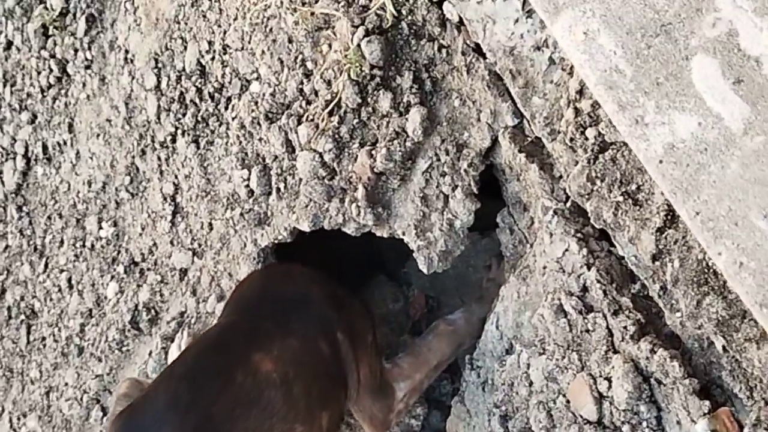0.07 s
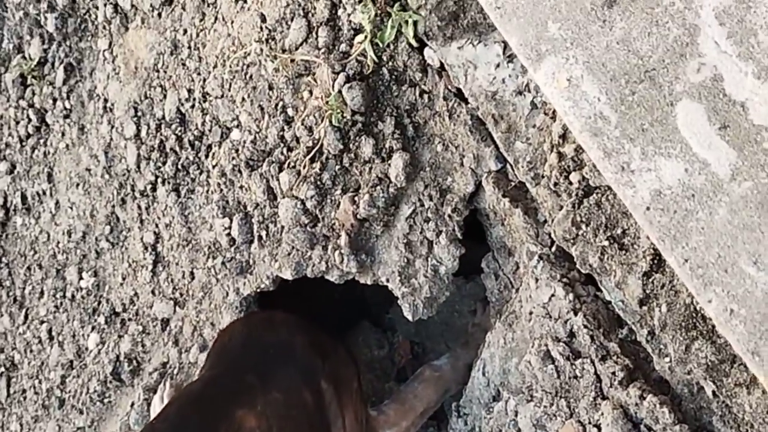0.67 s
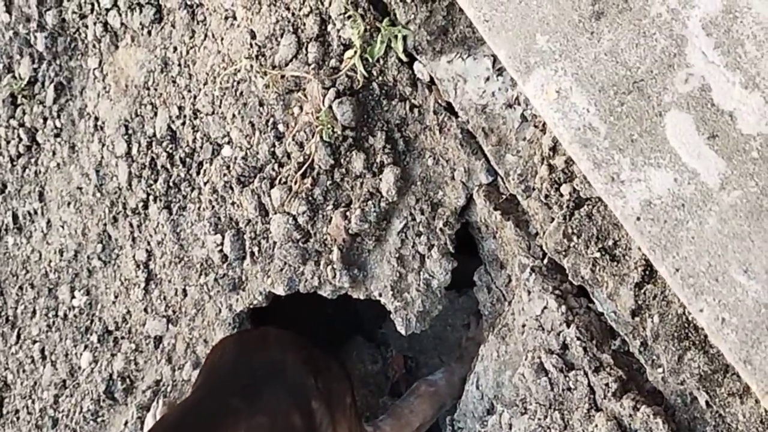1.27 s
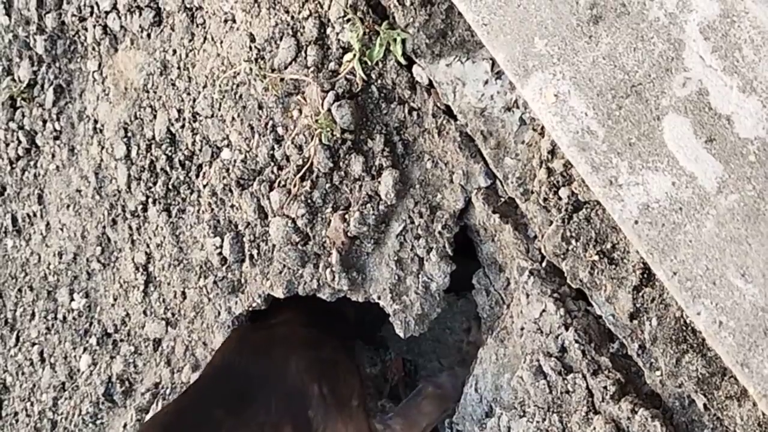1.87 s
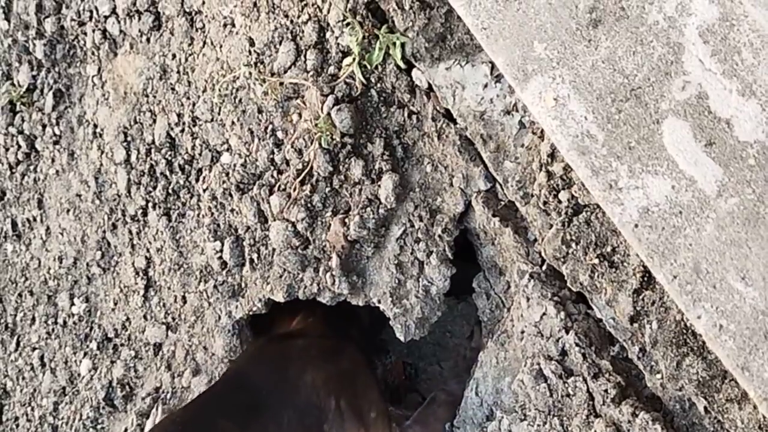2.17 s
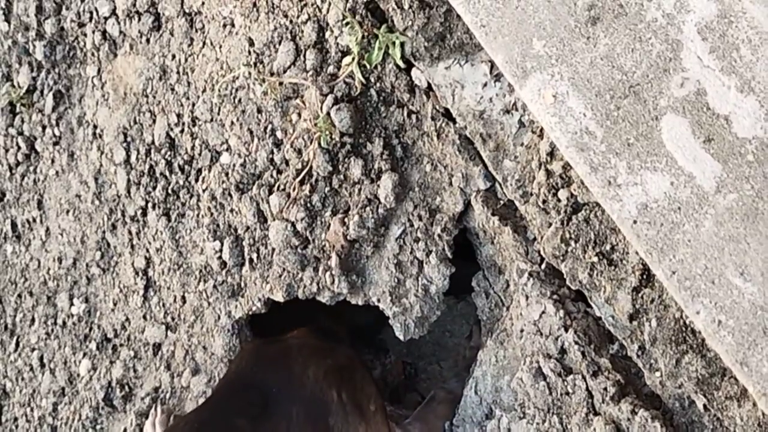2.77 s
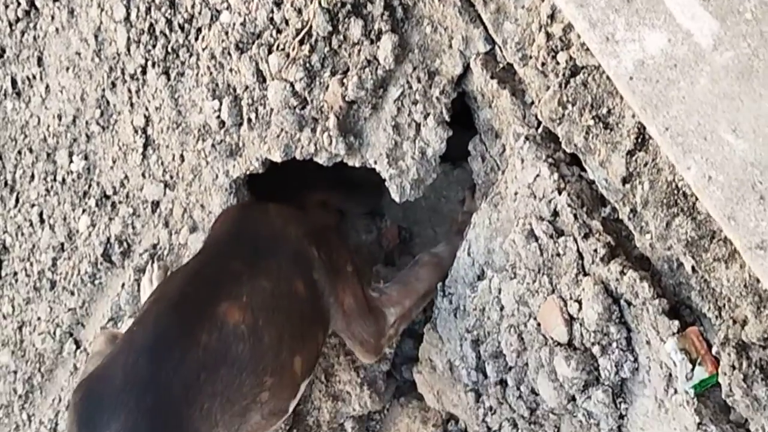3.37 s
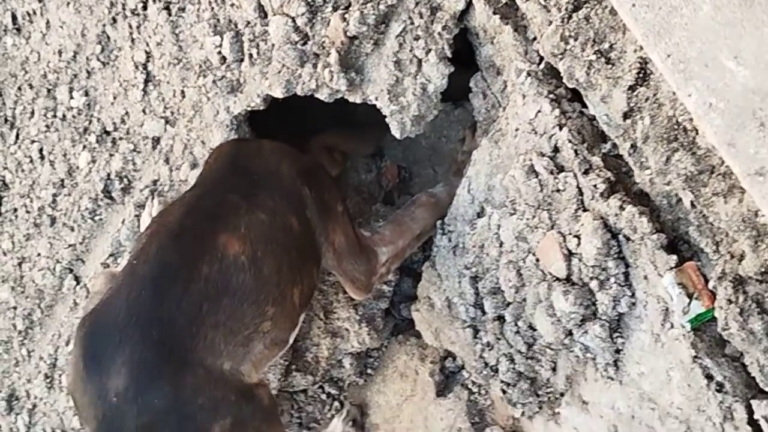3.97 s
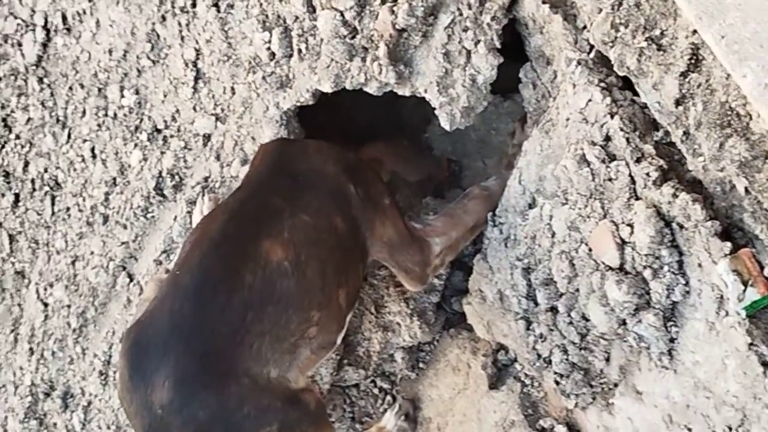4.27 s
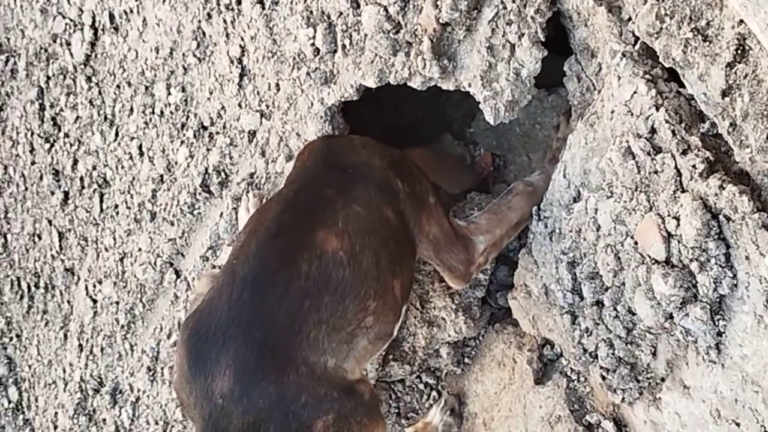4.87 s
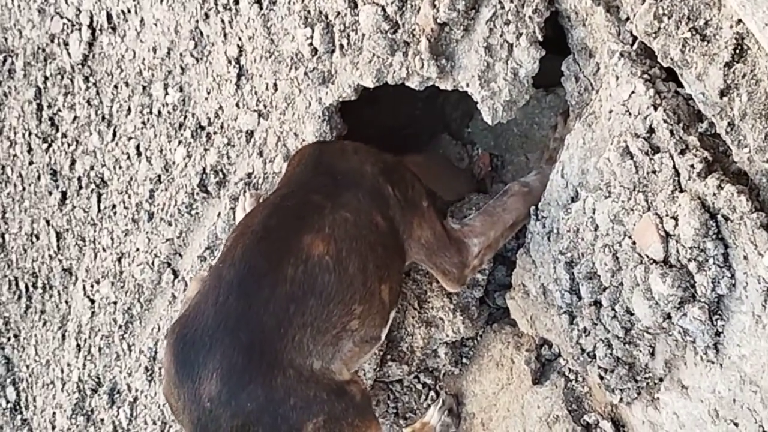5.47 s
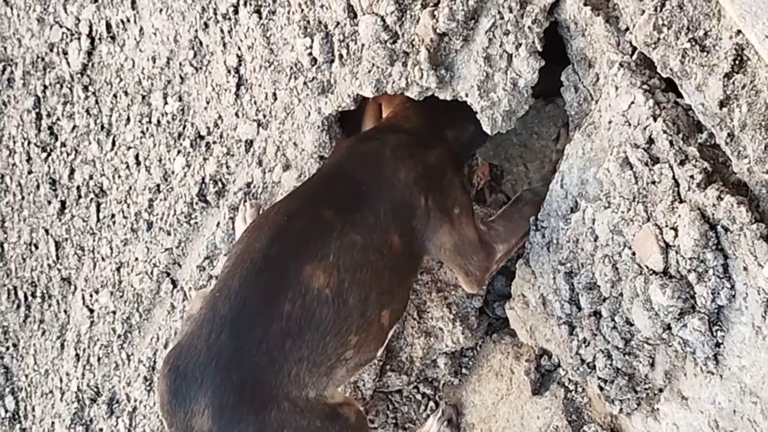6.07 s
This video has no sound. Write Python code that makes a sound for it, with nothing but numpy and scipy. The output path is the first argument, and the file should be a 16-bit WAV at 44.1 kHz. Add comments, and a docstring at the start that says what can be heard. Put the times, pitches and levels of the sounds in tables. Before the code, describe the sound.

A bird sings hoarse rasps, buzzes, stuttered chips and thin whistles close by, over distant traffic rumble and a wavering engine hum.

```python
"""Distant traffic rumbles, and a far engine hums through it in wavering swells.
Close by on the right a bird sings: hoarse low rasps and two phrases of a buzz, a rasp, stuttered chips
and a thin slurred whistle. Its syrinx vibrates, its throat resonances shape the harmonics, and air
hisses through its bill. A dog stands quietly with its head in a hole; now and then a little grit
shifts under it."""
import sys
import numpy as np
from scipy import signal
from scipy.fft import rfft, irfft, next_fast_len
from scipy.io import wavfile
from scipy.ndimage import uniform_filter1d

SR = 44100
rng = np.random.default_rng(int(sys.argv[2]) if len(sys.argv) > 2 else 0)


def put_to_file(sound):
    """Save the sound as 16-bit audio at rate SR, in the file named by the first command-line argument."""
    columns = np.atleast_2d(sound).T  # one column per channel
    safe = np.clip(columns, -1, 1)
    whole_steps = np.round(safe * 32767)
    wavfile.write(sys.argv[1], SR, whole_steps.astype(np.int16))


N = 274743

# Road rumble and far hiss. Each row: frequency in Hz, relative spectral density in dB.
RUMBLE_SPECTRUM = [(12, -39), (20, -9), (65, -4), (97, -5), (128, -4.5), (151, -8.5), (386, -18),
                   (416, -19.5), (594, -20.5), (700, -29), (910, -65), (1540, -120)]
FAR_HISS_SPECTRUM = [(500, -8.5), (700, 9), (1200, 6), (2000, 4.5), (2700, 0), (3500, -7), (4700, -4.5),
                     (6200, -4), (7500, -9.5), (8700, -7.5), (11000, -11.5), (13000, -22), (15500, -25)]
# Coherence of the background. Each row: frequency in Hz, left-right correlation.
COHERENCE = [(60, 1), (120, 0.9646), (240, 0.968), (480, 0.494), (950, 0.094), (1890, -0.025), (3770, 0.22),
             (7520, -0.042), (15000, -0.22)]
# Balance of the background. Each row: frequency in Hz, left minus right in dB.
BALANCE = [(60, 1.5), (150, 0), (380, -1.5), (950, -1.5), (2380, -1.5), (5980, -6), (15000, 2.5)]
# The engine gathers speed, then drops. Each row: time in seconds, shaft rate in Hz.
ENGINE_SPEED = [(0, 29.7), (1.6, 30.7), (3.8, 34.44), (4.3, 35.08), (5.1, 36.7), (5.25, 26.26),
                (6.23, 26.9)]
# Engine harmonics. Each row: multiple of the shaft rate, relative level in dB.
ENGINE_ORDERS = [(2, -9), (3, -1), (5, -11)]
# Swells of the hum. Each row: start in seconds, length in seconds, relative level in dB.
HUM_SWELLS = [(.55, 1.34, -36.5), (2.079, 0.867, -36), (3.026, 0.856, -34.5), (4.07, 1.04, -36.5),
              (5.305, 1.2, -36.5)]
# Whistles. Each row: start and length in seconds, first, middle and last pitch in Hz, level in dB.
WHISTLES = [(0.244, 0.046, 4120, 3570, 3340, -58.5), (2.04, 0.11, 3000, 2667, 2300, -51),
            (2.162, 0.0465, 1796, 2460, 3070, -47.5), (2.182, 0.0217, 4800, 5000, 4700, -51),
            (4.396, .13, 2965, 2870, 2670, -55), (5.007, 0.094, 3100, 2720, 2603, -53),
            (5.136, 0.0368, 1793, 2170, 2585, -45)]
# Rasps. Each row: start, length, attack and release in seconds, then the crest's level in dB,
# pitch in Hz and roughness from 0 to 1.
RASPS = [(.64, 0.3314, 0.086, 0.0795, -37, 1683, 0.81), (1.274, 0.4142, 0.1387, 0.081, -31, 1792, 0.83),
         (4.147, .27, 0.0223, 0.0633, -28, 1353, .05), (4.782, 0.248, 0.064, 0.102, -44, 1414, 0.78),
         (5.361, 0.4032, 0.1284, 0.119, -38.5, 1458, 0.67), (6.031, .34, 0.195, 0.1023, -35.5, 1409, .8)]
# Throat resonances of the low and high voices. Each row: frequency in Hz, relative gain in dB.
LOW_THROAT = [(700, 20.5), (1080, 3), (1330, -3), (1650, -3), (2150, -5.5), (2600, -26), (3700, -28),
              (6000, -30.5), (9000, -60.5)]
HIGH_THROAT = [(1200, -23), (1800, -7.5), (2300, 3), (2850, 2), (3500, 1.5), (4200, -1), (4900, 5),
               (5450, 6), (6100, -5), (6750, -4), (7500, -9.5), (8300, -6), (11000, -21.5), (15000, -32)]
# Air through the bill. Each row: frequency in Hz, relative spectral density in dB.
BILL_HISS = [(500, 1), (1000, 12), (2500, 2), (3800, -3), (5700, 4), (6700, 3.5), (7600, 6.5), (9000, -1),
             (12000, -8), (15500, -22.5)]
# Quick pips, then a held note. Each row: start in seconds, number of pips, pip spacing and held length
# in seconds, the held note's first and last pitch in Hz, opening level in dB, held note's fade in dB.
STUTTERS = [(1.154, 0, .0125, 0.0073, 1336, 1200, -32.5, 6),
            (1.628, 0, .0125, 0.028, 1211, 1072, -33.5, 12),
            (1.722, 1, 0.0119, 0.0211, 1198, 1097, -37.5, 5),
            (1.822, 3, .013, 0.0176, 1212, 1241, -34, 0.5), (1.957, 4, 0.01244, 0.048, 1190, 1020, -36, 18),
            (4.078, 0, .0125, 0.0108, 1250, 1151, -31.5, 5), (4.568, 1, .0115, 0.0315, 1275, 1076, -35, 6),
            (4.681, 1, 0.0136, 0.015, 1201, 1100, -39, 3),
            (4.78, 2, 0.01234, 0.02022, 1228, 1172, -35, 2.5),
            (4.9077, 5, 0.01156, 0.0685, 1206, 1044, -34.5, 12)]
# Buzzes. Each row: start and warble length in seconds, level in dB, starting pitch in Hz.
BUZZES = [(1.164, .097, -28.5, 1328), (4.091, 0.0848, -27, 1316)]
# The song at two microphone ports. Each row: frequency in Hz, left phase lead in radians
# (before limiting), left minus right in dB.
PORTS = [(500, 0, 24), (1110, -0.11, -4), (1630, 0.76, -10.5), (2237, 1.5, 1), (2296, -1.92, -5),
         (3120, -1.5, -1.5), (3663, 2.5, 6), (4370, 0.65, -4.5), (5360, 1.5, -16), (6700, 1.46, 2),
         (7500, -1.12, -7), (9550, -1.7, 3)]
# Shifts of grit. Each row: start in seconds, length in seconds, level in dB.
GRIT = [(2.692, 0.0592, -56.5), (2.728, 0.015, -62.5), (3.22, 0.071, -56.5), (4.772, .006, -57),
        (6.011, 0.0073, -62)]


def gain_of(db):
    """Amplitude grows tenfold for every 20 dB."""
    return 10 ** (np.asarray(db) / 20)


def unit_rms(x):
    """Normalisation to unit mean power."""
    return x / np.sqrt(np.mean(x ** 2) + 1e-20)


def at_hz(points, hz):
    """Interpolation of a spectrum on a logarithmic frequency axis."""
    knots_hz, value = np.transpose(points)
    return np.interp(np.log(hz + 1), np.log(knots_hz + 1), value)


def follow(rows, x):
    """Linear interpolation of each later column against the first."""
    knots, *columns = np.transpose(rows)
    return [np.interp(x, knots, column) for column in columns]


def add(mix, start, sound):
    """Superposition: a sound joins the mix at its start in seconds."""
    part = mix[max(round(start * SR), 0):][:len(sound)]
    part += sound[:len(part)]


def noise(spectrum, size):
    """Spectral shaping of white noise, at unit power."""
    shape = gain_of(at_hz(spectrum, np.fft.rfftfreq(size, 1 / SR)))
    return unit_rms(irfft(rfft(rng.standard_normal(size)) * shape, size))


def wander(size, top_hz):
    """Low-pass filtering turns noise into a drift, mostly slower than top_hz."""
    padded = next_fast_len(size + SR // 4)
    hz = np.fft.rfftfreq(padded, 1 / SR)
    spectrum = rfft(rng.standard_normal(padded)) / (1 + (hz / top_hz) ** 2) ** 2
    return unit_rms(irfft(spectrum, padded))[:size]


def taper(t, fade_s):
    """A raised-cosine envelope keeps a note's ends from clicking."""
    return np.sin(np.pi / 2 * np.clip(np.minimum(t - t[0], t[-1] - t) / fade_s, 0, 1)) ** 2


def diffuse_noise(spectrum, patchy_db):
    """Partial coherence: noise with drifting patches of level is alike on both sides in the bass."""
    frames, hz = N // 512 + 5, np.fft.rfftfreq(2048, 1 / SR)
    a, b, c, d, patches = rng.standard_normal((frames, len(hz), 5)).T
    patches = unit_rms(uniform_filter1d(uniform_filter1d(patches, size=24, axis=0), size=10, axis=1))
    coherence = at_hz(COHERENCE, hz)[:, None]
    left = a + 1j * b
    right = coherence * left + np.sqrt(1 - coherence ** 2) * (c + 1j * d)
    tilt = gain_of(at_hz(BALANCE, hz)[:, None] / 2)
    spectra = np.array([left * tilt, right / tilt])
    spectra *= gain_of(at_hz(spectrum, hz)[:, None] + patchy_db * patches)
    stereo = signal.istft(spectra, nperseg=2048, noverlap=1536)[1][:, :N]
    return stereo / np.std(stereo.mean(0))


def engine(fade_s=0.1274, lull_db=-51, trim_db=-1):
    """A rotating engine radiates harmonics of its shaft rate; the hum swells over a faint drone."""
    t = np.arange(N) / SR
    shaft_hz = follow(ENGINE_SPEED, t)[0] * (1 + 0.00795 * wander(N, 11.65))
    angle = 2 * np.pi * np.cumsum(shaft_hz) / SR
    hum = sum(gain_of(db) * np.sin(k * angle) * (1 + 0.122 * wander(N, 9)) for k, db in ENGINE_ORDERS)
    swells = sum(gain_of(db) * np.clip(np.minimum(t - start, start + length - t) / fade_s, 0, 1)
                 for start, length, db in HUM_SWELLS)
    return gain_of(trim_db) * np.maximum(swells, gain_of(lull_db)) * unit_rms(hum)


def traffic(rumble_db=-34.5, hiss_db=-48):
    """Incoherent sources add in power: one engine, far hiss and road rumble."""
    hum = engine()
    hiss = gain_of(hiss_db) * diffuse_noise(FAR_HISS_SPECTRUM, patchy_db=1.3)
    rumble = gain_of(rumble_db) * diffuse_noise(RUMBLE_SPECTRUM, patchy_db=1)
    return hum + hiss + rumble


def whistle(start, length, first_hz, middle_hz, last_hz, level_db, octave_db=-9, flicker_db=4):
    """Random modulation of pitch and level unsettles a gliding tone with a weak octave."""
    t = np.arange(0, length, 1 / SR)
    pitch = np.interp(t, [0, length / 2, length], [first_hz, middle_hz, last_hz])
    pitch *= 1 + .035 * wander(len(t), 700)
    angle = 2 * np.pi * np.cumsum(pitch) / SR
    tone = np.sin(angle) + gain_of(octave_db) * np.sin(2 * angle)
    tone *= gain_of(flicker_db * wander(len(t), 150))
    return start, gain_of(level_db) * unit_rms(tone) * taper(t, 0.00128)


def syrinx(pitch, throat, odd_db=0, count=12):
    """Source and filter: each harmonic swells as it sweeps through a throat resonance."""
    turns = np.cumsum(pitch) / SR
    k = np.arange(1, count + 1)[:, None]
    hz = k * abs(pitch)
    amplitudes = gain_of(at_hz(throat, hz) + odd_db * (k % 2)) * (hz < SR / 2)
    return unit_rms((amplitudes * np.sin(2 * np.pi * (k * turns + rng.random((count, 1))))).sum(0))


def rasp_breath(start, length, attack_s, release_s, crest_db, crest_hz, crest_rough,
                crest_share=.63, droop=.15, swell_db=5.5, loose_hz=1560, loose_rough=0.8135):
    """One push of air governs level, pitch and roughness: loudest at its crest, loose at both ends."""
    t = np.arange(0, length, 1 / SR)
    slack = 1 - np.sin(np.interp(t / length, [0, crest_share, 1], [0, np.pi / 2, np.pi]))
    loose = slack ** 3
    gate = np.clip(np.minimum(t / attack_s, (length - t) / release_s), 1e-3, 1)
    level_db = crest_db + 20 * np.log10(gate) - swell_db * slack
    pitch = (1 - loose) * crest_hz * (1 - droop * slack) + loose * loose_hz
    rough = (1 - loose) * crest_rough + loose * loose_rough
    return start + t, level_db, pitch, rough


def rasp(row, flutter_hz=74, depth=0.2023, jitter=.135, throb=0.44, half_db=1, hiss_db=-12):
    """Nonlinear oscillation: a low note flips between two pitches and turns chaotic as the bill hisses."""
    t, level_db, pitch, rough = rasp_breath(*row)
    flutter_rate = flutter_hz * (1 + .3 * rough * wander(len(t), 57.44))
    flutter = np.tanh(2 * np.sin(2 * np.pi * np.cumsum(flutter_rate) / SR))
    flutter *= 1 - 0.607 * rough  # chaos blurs the regular flutter
    pitch *= 1 + depth * flutter + jitter * rough * wander(len(t), 600)
    # Period doubling: in clean stretches alternate cycles differ, adding a partial at 3/2 of the pitch.
    half_partial = np.sin(3 * np.pi * np.cumsum(pitch) / SR)
    half_partial *= gain_of(half_db + at_hz(LOW_THROAT, 3 / 2 * abs(pitch)))
    tone = syrinx(pitch, LOW_THROAT, count=7) + np.sqrt(2) * (1 - rough) ** 2 * half_partial
    tone *= 1 + 0.213 * rough * wander(len(t), 900)
    tone = signal.sosfilt(signal.butter(4, 950, "highpass", fs=SR, output="sos"), tone)
    # Higher notes hiss higher; harder, rougher blowing hisses more.
    bill = [(hz * np.sqrt(pitch.mean() / 1650), db) for hz, db in BILL_HISS]
    blowing_db = 0.087 * (level_db - level_db.max()) + 5 * (rough - 0.5)
    hiss = gain_of(hiss_db + blowing_db) * noise(bill, len(t))
    envelope = gain_of(level_db) * (1 + throb * flutter) * taper(t, 0.018)
    return t[0], envelope * (unit_rms(tone) + hiss)


def chip(start, length, first_hz, last_hz, level_db, fade_db):
    """A steepening downward glide decays exponentially, with its odd harmonics weakened."""
    t = np.arange(0, max(length, .004), 1 / SR)
    progress = t / t[-1]
    pitch = first_hz + (last_hz - first_hz) * (progress + progress ** 2) / 2
    pitch *= 1 + .016 * wander(len(t), 900)
    envelope = gain_of(level_db - fade_db * progress) * taper(t, 0.00092)
    return start, envelope * syrinx(pitch, HIGH_THROAT, odd_db=-7)


def stutter(start, pips, spacing, held_s, first_hz, last_hz, level_db, fade_db,
            duty=0.506, tiring_db=0.3461):
    """Interrupted oscillation: the voice catches in pips that sag in pitch, and then holds."""
    notes = [chip(start + k * spacing, duty * spacing, 1.05 * first_hz, .9 * first_hz,
                  level_db - k * tiring_db, fade_db=2.97) for k in range(pips)]
    held = chip(start + pips * spacing, held_s, first_hz, last_hz, level_db - pips * tiring_db, fade_db)
    return notes + [held]


def buzz_contour(start, length, buzz_db, first_hz, settle_s=0.0194, onset_db=-11.5, climb=.09,
                 break_s=0.0059, squeak_s=0.0186, squeak_hz=1719, sag_hz_per_s=7430, fade_db=16.5):
    """A change of vibration regime: the warble settles, climbs and breaks into a sagging squeak."""
    t = np.arange(0, length + squeak_s, 1 / SR)
    warbling, after = t < length, np.maximum(t - length, 0)
    settling = np.exp(-t / settle_s)
    breaking = np.exp(-abs(t - length) / break_s)
    level_db = buzz_db + np.where(warbling, onset_db * settling, -fade_db * (after / squeak_s) ** 2)
    pitch = np.where(warbling, first_hz * (1 + climb * t / length), squeak_hz - sag_hz_per_s * after)
    rough = 0.273 * settling + np.where(warbling, 0.5, .2) * breaking + 0.0364
    warble_share = warbling * (1 - 0.71 * rough)
    return start + t, level_db, pitch, warble_share, rough


def buzz(row, warble_hz=148, depth=0.059, jitter=0.104, throb=.25, hiss_db=-10):
    """Fast modulation of pitch and amplitude gives the high voice sidebands, heard as a buzz."""
    t, level_db, pitch, warble_share, rough = buzz_contour(*row)
    angle = 2 * np.pi * warble_hz * (t - t[0])
    warble = warble_share * (np.sin(angle) + 0.47 * np.sin(2 * angle))
    pitch *= 1 + depth * warble + jitter * rough * wander(len(t), 910)
    tone = syrinx(pitch, HIGH_THROAT)
    hiss = gain_of(hiss_db) * np.sqrt(rough) * noise(BILL_HISS, len(t))
    envelope = gain_of(level_db) * (1 + throb * warble) * taper(t, 0.00083)
    return t[0], envelope * (tone + hiss)


def diffraction(song, max_lead_rad=2.4):
    """Direct sound bends round a housing and reaches its two ports unequal in phase and level."""
    lead, tilt_db = follow(PORTS, np.fft.rfftfreq(2 * N, 1 / SR))
    left = gain_of(tilt_db / 2) * np.exp(.5j * np.clip(lead, -max_lead_rad, max_lead_rad))
    ports = np.array([left, 1 / left])
    return irfft(rfft(song, 2 * N) * ports / abs(ports.mean(0)))[:, :N]


def reflections(song, near_db=-6, near_t60=0.035, far_db=-19, far_t60=0.4):
    """Reverberation: close concrete scatters the song, and far walls add a faint tail."""
    t = np.arange(SR // 2) / SR
    taps = rng.choice([-1., 1.], (2, len(t))) * (rng.random((2, len(t))) < .2)
    near = taps * gain_of(-60 * t / near_t60) * (t > .0004)
    far = taps * gain_of(-60 * t / far_t60) * (t > .012)
    response = sum(gain_of(db) * paths / np.linalg.norm(paths, axis=1, keepdims=True)
                   for db, paths in [(near_db, near), (far_db, far)])
    return signal.fftconvolve(song[None], response, axes=1)[:, :N]


def bird():
    """Multipath propagation: every note arrives both directly and by reflection."""
    notes = [rasp(row) for row in RASPS] + [buzz(row) for row in BUZZES]
    notes += [whistle(*row) for row in WHISTLES]
    notes += [note for row in STUTTERS for note in stutter(*row)]
    song = np.zeros(N)
    for note in notes:
        add(song, *note)
    return diffraction(song) + reflections(song)


def grit(unevenness_db=4, band_hz=(3000, 11000)):
    """Granular noise: dry soil crumbles in dense, tiny clicks of uneven size."""
    stereo = np.zeros((2, N))
    band = signal.butter(2, band_hz, "bandpass", fs=SR, output="sos")
    for start, length, level_db in GRIT:
        size = round(length * SR)
        for side in stereo:
            clicks = rng.standard_normal(size) * gain_of(unevenness_db * rng.exponential(1, size))
            crumble = signal.sosfilt(band, clicks) * np.hanning(size)
            add(side, start, gain_of(level_db) * unit_rms(crumble))
    return stereo


def scene():
    """Superposition of bird, soil and distant road."""
    return bird() + grit() + traffic()


def record(dry):
    """Band limiting: a linear-phase low-pass filter removes the highest treble."""
    lowpass = signal.firwin(511, cutoff=15750, window=("kaiser", 9), fs=SR)
    return signal.oaconvolve(dry, lowpass[None], "same")


dry = scene()
out = record(dry)
put_to_file(out)
```